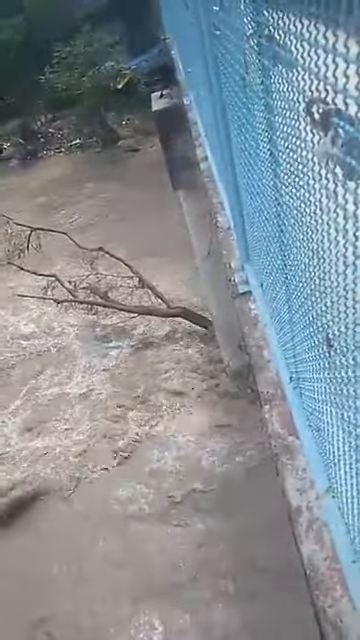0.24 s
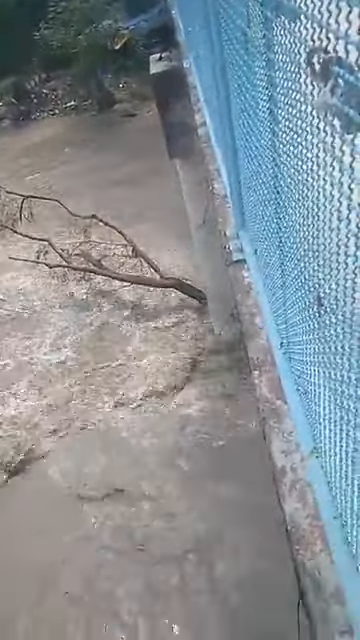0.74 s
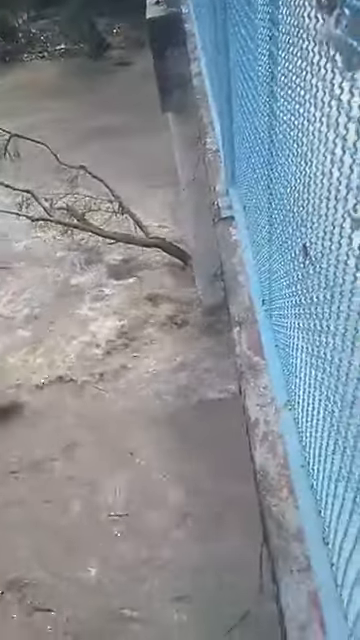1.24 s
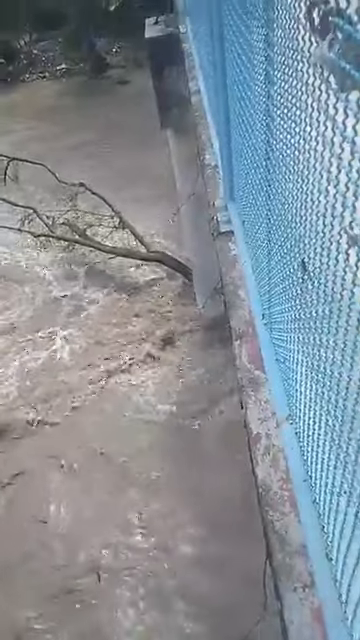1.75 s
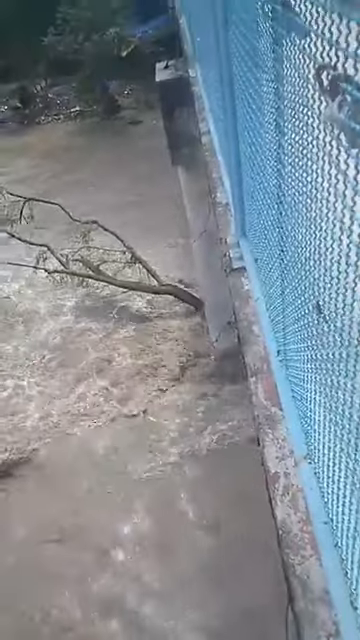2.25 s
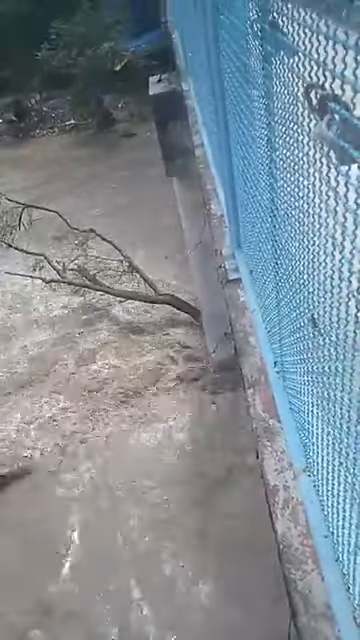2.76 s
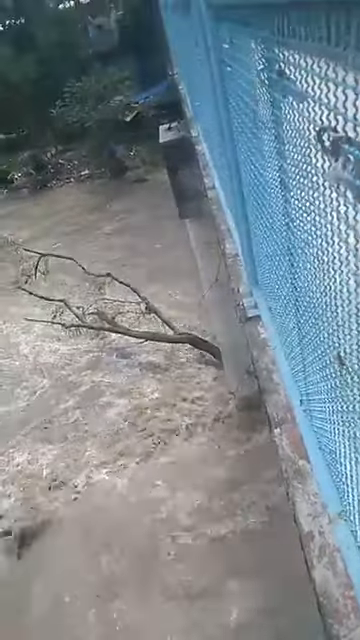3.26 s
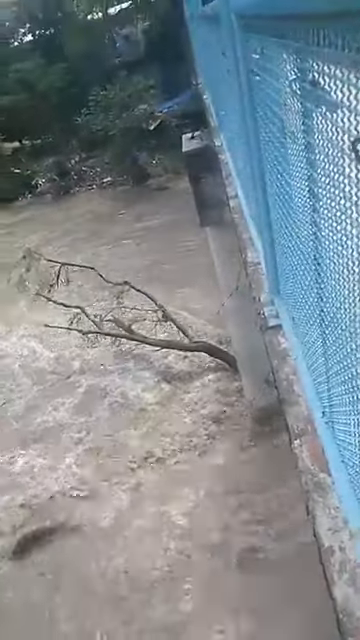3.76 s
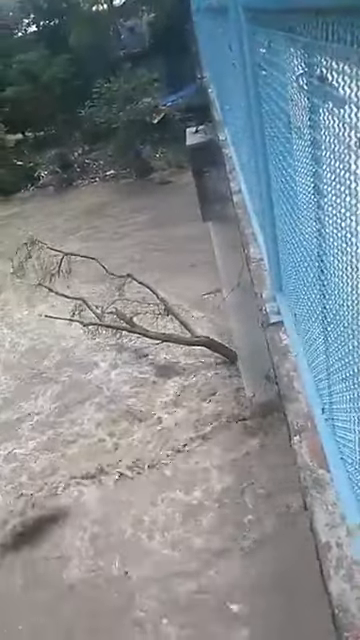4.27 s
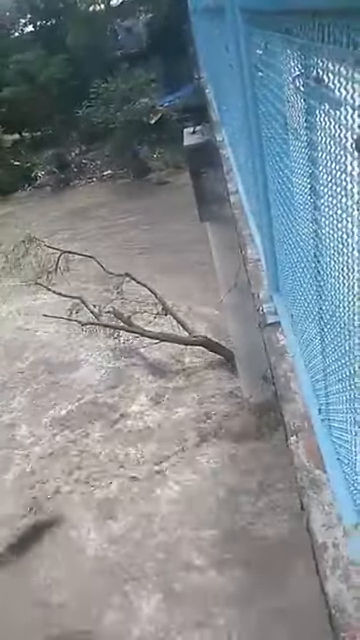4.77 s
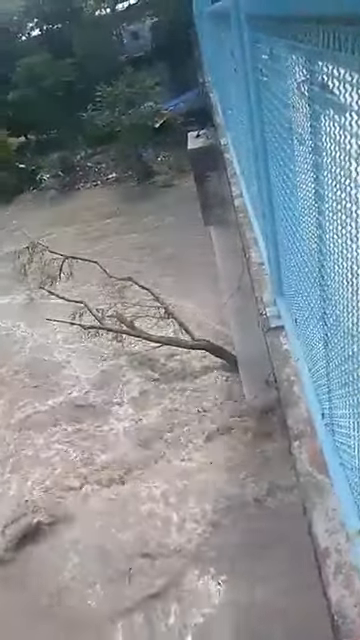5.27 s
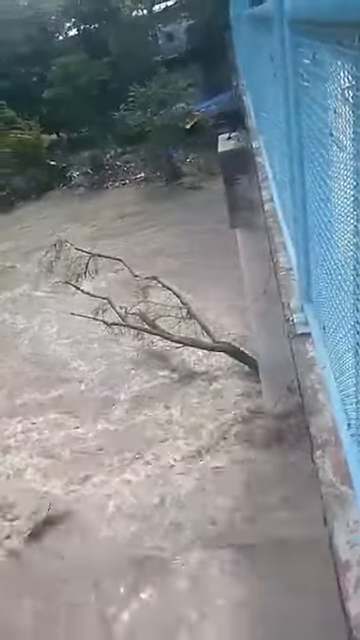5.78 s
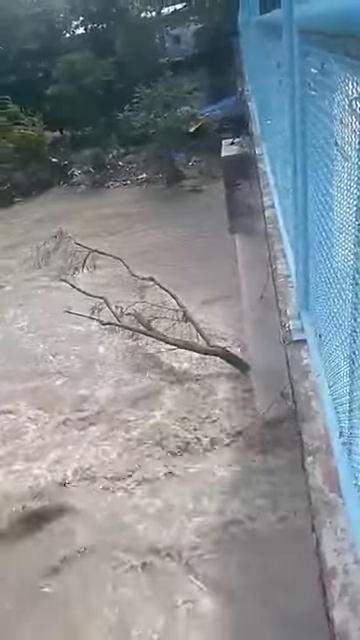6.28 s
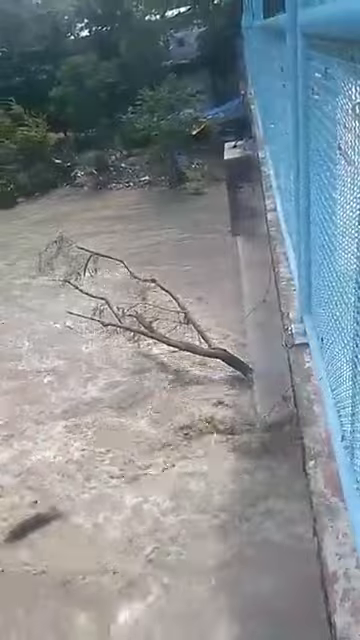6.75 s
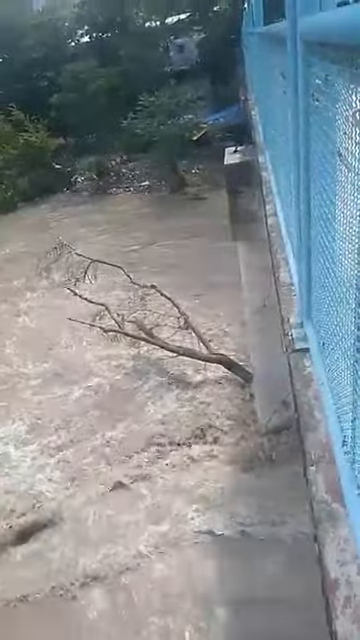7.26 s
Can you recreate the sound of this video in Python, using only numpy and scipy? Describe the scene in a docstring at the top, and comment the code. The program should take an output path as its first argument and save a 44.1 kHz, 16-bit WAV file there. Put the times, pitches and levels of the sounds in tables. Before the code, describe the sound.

A swollen river seethes and fizzes below a railing, its constant rush broken by clustered deep glugs and bright watery plops.

```python
"""A swollen river rushes under a bridge, heard from the railing above.
Shaped noise makes the deep current and patchy spray; swarms of damped sines ring as bubbles.
Trapped air gulps and gurgles in runs of rising damped sines, with an echo under the deck.
Drifting notches, short dropouts and patchy flicker cut into the water; a puff of wind rumbles at the start."""
import sys
import numpy as np
from scipy import signal
from scipy.fft import rfft, irfft, next_fast_len
from scipy.io import wavfile
from scipy.ndimage import uniform_filter1d, map_coordinates

SR = 44100
rng = np.random.default_rng(int(sys.argv[2]) if len(sys.argv) > 2 else 0)


def dump(signal):
    """Clip the signal to [-1, 1] and save it as 16-bit WAV at the path in sys.argv[1]."""
    limited = np.clip(np.atleast_2d(signal).T, -1, 1)
    pcm = np.round(limited * 32767).astype(np.int16)
    wavfile.write(sys.argv[1], SR, pcm)


N = 331632

# spray thrown by the standing waves: start_s, level_db (before trim)
FOAM = [(0.0, -26), (0.04, -26), (0.63, -25.5), (1.17, -28.5), (1.19, -31), (1.23, -27), (1.51, -27.5),
        (1.8, -26.5), (2.09, -28.5), (2.2, -26), (2.74, -26), (2.87, -26), (2.97, -27), (3.08, -26),
        (3.25, -27.5), (3.46, -26), (3.79, -27), (3.81, -26.5), (4.04, -27), (4.42, -25), (4.46, -26.5),
        (5.07, -24.5), (5.09, -26), (5.44, -24.5), (5.55, -26.5), (6.47, -23.5), (6.93, -26), (6.97, -25),
        (7.5, -24.5), (7.52, -27.5)]
# random slosh on top of the slow swells; wander of the ringing pitch
SLOSH_KNOTS_PER_S, DRIFT_KNOTS_PER_S = 12, 6
# wander as a share of the pitch
CHURN_DRIFT, SPRAY_DRIFT = 0.012, 0.004


def amp(db):
    """Decibels to gain."""
    return 10 ** (np.asarray(db) / 20)


def unit(x):
    """Scale to rms 1."""
    return x / np.sqrt(np.mean(x ** 2) + 1e-20)


def along(points, hz):
    """Read (Hz, value) points on a log frequency axis."""
    f, v = np.transpose(points)
    return np.interp(np.log(hz + 1), np.log(f + 1), v)


def curves(rows):
    """One value per sample for each column after the time."""
    s, *cols = np.transpose(rows)
    return [np.interp(np.arange(N) / SR, s, c) for c in cols]


def wobble(knots_per_s):
    """A smooth curve through random knots."""
    knots = rng.standard_normal(int(N * knots_per_s / SR) + 4)
    return map_coordinates(knots, [np.arange(N) * knots_per_s / SR])


def filtered(x, response):
    """x times a response of frequency."""
    size = next_fast_len(N + SR // 2)
    gain = response(np.fft.rfftfreq(size, 1 / SR))
    return irfft(rfft(x, size) * gain, size)[:N]


def coloured(x, spectrum):
    """x through a spectrum, at rms 1."""
    return unit(filtered(x, lambda hz: amp(along(spectrum, hz))))


def patches(shape, size):
    """A smooth random field over frequency and time, rms 1; size is (bins of 43 Hz, steps of 12 ms)."""
    field = rng.standard_normal(shape)
    for axis in (0, 1, 0, 1):
        field = uniform_filter1d(field, size=size[axis], axis=axis)
    return unit(field)


def patchy_noise(patchy_db, size):
    """Noise whose level varies in patches of frequency and time, rms 1."""
    z = signal.stft(rng.standard_normal(N), nperseg=1024)[2]
    patched = z * amp(patchy_db * patches(z.shape, size))
    return unit(signal.istft(patched)[1][:N])


def drifting(x, share):
    """x with its pitch wandering by a share."""
    speed = 1 + share * wobble(DRIFT_KNOTS_PER_S)
    return map_coordinates(x, [np.cumsum(speed)], mode="mirror")


def bubbles(starts_s, hz, gains, cycles, rise):
    """Damped sines, 40 dB down after the given cycles, that rise in pitch as each bubble nears the surface."""
    n = np.arange(int(cycles * SR / hz.min()) + 2)
    turns = hz[:, None] * n / SR
    age = turns / cycles
    tone = np.sin(2 * np.pi * turns * (1 + rise * age / 2))
    attack = 1 - np.exp(-turns / 1.31)
    ring = tone * np.exp(-np.log(100) * age) * attack
    where = (np.abs(starts_s) * SR).astype(int)[:, None] + n
    return np.bincount(where.ravel(), (gains[:, None] * ring).ravel(), N)[:N]


def swarm(count, low_hz, high_hz, cycles, spread_db):
    """Bubbles of random size at random moments, rms 1; a positive spread makes a few much louder."""
    when, size, luck = rng.random((count, 3)).T
    gains = amp(-spread_db * np.log(luck + 0.01))
    hz = low_hz + (high_hz - low_hz) * size
    return unit(bubbles(when * N / SR, hz, gains, cycles, rise=0.1))


def sheen(hz):
    """Gain of the narrow resonances that colour the spray."""
    # centre_hz, width_hz, lift_db
    resonances = [(7396, 81, 9), (8060, 120, 5), (8170, 91, 5)]
    return amp(sum(db / (1 + (2 * (hz - centre) / width) ** 2) for centre, width, db in resonances))


def white_water():
    """Tiny bubbles wash and fizz along the pier and bursting foam hisses above them."""
    # wash along the pier: start_s, level_db (before trim)
    pier = [(0.0, -46), (0.75, -39.5), (0.79, -43.5), (0.98, -40), (1.38, -42), (1.42, -37.5),
            (2.83, -42.5), (2.99, -39.5), (3.31, -46), (3.56, -43.5), (4.52, -43.5), (5.05, -38),
            (5.17, -45), (5.19, -38.5), (5.55, -42.5), (5.63, -45), (6.35, -38), (7.01, -42.5),
            (7.39, -40.5), (7.52, -41)]
    # splashes that stand out: centre_s, lift_db, half_length_s
    splashes = [(2.237, 2, 0.0044), (3.83, 1, 0.029), (4.35, 1, 0.052)]
    # relative spectra, low to high: freq_hz, level_db_per_hz
    wash_spectrum = [(2400, -60), (2520, -33), (2620, 6.5), (2820, 10), (3180, 8), (3450, 3), (3700, -11),
                     (4000, -50)]
    fizz_spectrum = [(3300, -50), (3600, -7.5), (3760, -4), (3940, -2.5), (4100, 8), (4350, 8), (5100, 9.5),
                     (5450, 5.5), (5900, 9.5), (6500, -65)]
    spray_spectrum = [(5500, -37.5), (5950, -15.5), (6300, -3), (6570, -11.5), (6950, -1.5), (7350, -2.5),
                      (7600, -4.5), (8200, 1.5), (8680, 2), (8850, -22), (9020, -4), (9200, -19),
                      (9600, -62)]
    mist_spectrum = [(9000, -44), (9250, -15), (9420, 19.5), (9750, 15.5), (10050, 13.5), (10250, -8),
                     (10480, -1), (10750, 8.5), (11900, 8), (12650, -1.5), (13400, 8), (14150, 3.5),
                     (14400, 9), (15700, -3)]

    t = np.arange(N) / SR
    slosh_db = -0.17 * wobble(SLOSH_KNOTS_PER_S)
    for s, lift_db, length_s in splashes:
        slosh_db = slosh_db + lift_db * np.exp(-((t - s) / length_s) ** 2)
    pier_db = curves(pier)[0]
    # the fizz is steadier: it follows a third of the wash's swells
    fizz_db = -34 + 0.34 * (pier_db - pier_db.mean()) + slosh_db
    wash_db = pier_db + slosh_db
    spray_db = curves(FOAM)[0] + slosh_db

    tiny_bubbles = swarm(count=12000, low_hz=2460, high_hz=6060, cycles=34.0, spread_db=-1)
    tiny = 0.21 * tiny_bubbles + patchy_noise(patchy_db=2.16, size=(4, 5))
    foam = filtered(patchy_noise(patchy_db=1.85, size=(3, 4)), sheen)
    spray = coloured(drifting(foam, SPRAY_DRIFT), spray_spectrum)
    mist = coloured(patchy_noise(patchy_db=1.54, size=(9, 8)), mist_spectrum)

    # small splashes make the spray flutter, faster than the waves swell
    flutter_db = 0.63 * wobble(50) + 0.5 * wobble(150)
    flutter_db = flutter_db - uniform_filter1d(flutter_db, size=SR // 10)
    return (amp(wash_db + 0.25 + 0.5 * flutter_db) * coloured(tiny, wash_spectrum)
            + amp(fizz_db + 0.5 * flutter_db) * coloured(tiny, fizz_spectrum)
            + amp(spray_db + 0.52 + 0.64 * flutter_db) * spray
            + amp(spray_db - 6.5 + 1.16 * flutter_db) * mist)


def churning():
    """Clouds of bubbles ring under the crests; the harder a crest breaks, the more it seethes."""
    # how hard the crests break: start_s, level_db (before trim)
    crests = [(0.0, -43.5), (0.29, -41.5), (0.33, -34), (0.52, -43), (1.42, -41.5), (1.65, -45),
              (1.72, -33.5), (1.99, -41.5), (2.03, -51), (2.28, -39.5), (2.7, -37.5), (2.79, -47),
              (2.85, -39), (3.01, -41), (3.08, -34), (3.2, -47), (3.22, -37.5), (3.46, -45), (3.58, -36),
              (4.0, -35.5), (4.04, -46.5), (4.44, -35), (4.59, -43.5), (4.63, -35), (4.75, -42),
              (4.82, -35), (5.74, -36), (5.82, -45.5), (5.93, -34), (6.14, -35), (6.22, -29.5),
              (6.53, -32.5), (6.68, -30.5), (6.74, -35), (7.08, -33.5), (7.52, -32)]
    # relative spectra of the clouds and of the added seethe: freq_hz, level_db_per_hz
    cloud_spectrum = [(800, -48), (1080, -18), (1200, 0.5), (1310, -5.5), (1480, 11), (1610, 9), (1730, -4),
                      (1880, 8), (2020, -30), (2200, -29), (2600, -70)]
    seethe_spectrum = [(850, -27), (1080, -7.5), (1350, 1), (1550, -1.5), (1700, 10.5), (1920, 3.5),
                       (2040, -1.5), (2150, -75), (2400, -60)]

    churn_db = curves(crests)[0] + 1.5 * wobble(SLOSH_KNOTS_PER_S)
    surge_db = churn_db - churn_db.mean()
    ringing = swarm(count=2000, low_hz=1060.0, high_hz=2046, cycles=126.0, spread_db=2.5)
    cloud_noise = patchy_noise(patchy_db=3, size=(2, 8))
    seethe_noise = patchy_noise(patchy_db=3.5, size=(2, 8))
    clouds = drifting(coloured(0.5 * ringing + cloud_noise, cloud_spectrum), CHURN_DRIFT)
    seethe = drifting(coloured(seethe_noise, seethe_spectrum), CHURN_DRIFT)
    return amp(churn_db - 1.8 - 0.24 * surge_db) * clouds + amp(churn_db - 9.0 + 0.77 * surge_db) * seethe


def current():
    """The deep, even roll of the river with small bubbles all over its surface."""
    # relative spectrum: freq_hz, level_db_per_hz
    roll_spectrum = [(20, -34), (55, -11), (68, -2.5), (88, -5), (170, -1.5), (330, -2), (410, -2),
                     (490, -7), (590, -6.5), (760, -6), (1100, -7.5), (1500, -37), (2400, -7), (3000, -70)]
    roll = amp(-54.0) * coloured(patchy_noise(patchy_db=2.5, size=(3, 5)), roll_spectrum)
    glugs = amp(-61) * swarm(count=160, low_hz=274, high_hz=417, cycles=10.7, spread_db=5.5)
    babble = amp(-60) * swarm(count=700, low_hz=637, high_hz=1247, cycles=28, spread_db=4.5)
    return roll + glugs + babble


def wind():
    """A short puff of wind rumbles on the microphone, holds and dies away."""
    # relative spectrum: freq_hz, level_db_per_hz
    buffet_spectrum = [(20, -18), (45, -21), (70, -1), (105, -12), (200, -19), (500, -60)]
    puff_db, hold_s, fall_db_per_s = -44.5, 0.072, 62
    falling_s = np.maximum(np.arange(N) / SR - hold_s, 0)
    return amp(puff_db - fall_db_per_s * falling_s) * coloured(rng.standard_normal(N), buffet_spectrum)


def strays(count, db, hz, scatter):
    """Rows of lesser air pockets, one at a random moment in each equal stretch of time."""
    when, strength, size = rng.random((count, 3)).T
    s = (np.arange(count) + when) / count * N / SR
    level_db = db + 2.5 * (2 * strength - 1)
    return np.transpose([s, level_db, hz * np.exp(scatter * (2 * size - 1))])


def clusters(rows, count, length_s, scatter, cycles, fade_db):
    """Each air pocket breaks into a run of bubbles of similar size; the second is the loudest."""
    s, db, hz = np.transpose(rows)[:, :, None]
    delay, size = rng.random((len(rows), 2, count)).transpose(1, 0, 2)
    lesser = np.arange(count) != 1
    # place in the run as a share of its length, 0 at the loudest
    place = (np.arange(count) - 1 + lesser * (delay - 0.5)) / count
    pitch_hz = hz * np.exp(scatter * lesser * (2 * size - 1))
    gains = amp(db + fade_db * (np.abs(place) + 0.06 * (place < 0)))
    return bubbles((s + length_s * place).ravel(), pitch_hz.ravel(), gains.ravel(), cycles, rise=0.034)


def air_pockets():
    """Waves fold over and swallow air: deep gulps, lighter gurgles, and rare thuds as whole waves slump."""
    # largest pockets, loudest mid-sized clusters, slumps: loudest_s, level_db (before trim), pitch_hz
    large_gulps = [(0.22, -37, 322), (0.348, -35, 392), (0.635, -37, 324), (1.21, -36, 380),
                   (1.292, -43.5, 194), (1.373, -33, 392), (1.408, -33, 398), (1.449, -48, 178),
                   (1.69, -37, 385), (1.76, -43, 380), (1.945, -37, 258), (2.21, -35.5, 361),
                   (2.264, -36.5, 370), (2.351, -29, 274), (2.395, -25.5, 330), (2.439, -31, 363),
                   (2.554, -29.5, 322), (2.599, -40.5, 198), (2.678, -26.5, 324), (2.8, -31.5, 315),
                   (3.084, -47, 203), (3.693, -31.5, 375), (3.99, -40.5, 340), (4.14, -37, 366),
                   (4.231, -29.5, 343), (4.28, -37.5, 378), (4.37, -40, 375), (4.843, -34.5, 271),
                   (5.04, -37.5, 364), (5.15, -37, 354), (5.206, -29.5, 312), (5.326, -37, 373),
                   (5.46, -38, 374), (6.048, -33.5, 263), (6.27, -39, 400), (6.457, -32, 390),
                   (6.529, -28, 320), (6.589, -23.5, 322), (6.638, -26.5, 263), (6.645, -38.5, 183),
                   (6.887, -31, 360), (6.949, -28.5, 286), (7.085, -35, 325), (7.232, -32, 349),
                   (7.296, -30.5, 332), (7.41, -38, 295), (7.481, -45, 221)]
    loud_gurgles = [(0.165, -39.5, 730), (0.435, -40.5, 698), (0.608, -31, 1197), (0.626, -39.5, 637),
                    (0.8, -35, 1196), (0.82, -43, 886), (1.52, -40, 750), (1.728, -36.5, 783),
                    (1.815, -40, 934), (1.92, -33, 1255), (2.06, -35.5, 1227), (2.103, -28.5, 1200),
                    (2.16, -32.5, 1200), (2.745, -33, 1240), (2.857, -31, 1214), (3.043, -35.5, 1005),
                    (3.084, -38, 834), (3.25, -44, 690), (5.258, -26, 1132), (5.27, -39, 740),
                    (5.33, -28, 1215), (5.525, -41, 915), (5.8, -31, 1245), (6.01, -37, 890),
                    (6.126, -28, 1143), (6.3, -29, 1244), (6.635, -34, 953), (6.645, -44, 750),
                    (6.64, -29, 1144), (6.674, -26, 1236), (6.79, -36, 1003), (7.14, -41, 716),
                    (7.39, -39, 910)]
    slumps = [(2.625, -56, 65), (3.495, -48, 81), (6.145, -50, 94), (6.625, -47.5, 78)]
    deep = np.vstack([large_gulps, strays(count=12, db=-43, hz=360, scatter=0.086)])
    light = np.vstack([loud_gurgles, strays(count=12, db=-49.5, hz=838, scatter=0.223)])
    gulps = clusters(deep, count=5, length_s=0.051, scatter=0.18, cycles=12.9, fade_db=-23.5)
    gurgles = clusters(light, count=4, length_s=0.06, scatter=0.032, cycles=38.5, fade_db=-12.5)
    thuds = clusters(slumps, count=3, length_s=0.057, scatter=0.25, cycles=4, fade_db=-22)
    return amp(3.5) * gulps + amp(1.5) * gurgles + amp(12.0) * thuds


def bridge(x):
    """The underside of the deck answers with a short diffuse tail: noise decaying at a rate set by frequency."""
    # echo between water and deck: freq_hz, t60_s
    decay = [(200, 0.28), (1000, 0.59), (8000, 0.13)]
    hz, t, z = signal.stft(rng.standard_normal(SR // 2), SR, nperseg=256)
    t60_s = along(decay, hz)[:, None]
    tail = signal.istft(z * np.exp(-np.log(1000) * t / t60_s))[1]
    return signal.fftconvolve(x, tail / np.linalg.norm(tail))[:N]


def notched(x):
    """Drifting notches, short dropouts and patchy flicker cut into the whole mix before the wind is added."""
    # steep-sided notch that drifts and changes width: start_s, centre_hz, width_hz
    drifting_notch = [(0, 3650, 450), (.35, 3530, 170), (.62, 3740, 100), (.9, 3550, 400),
                      (1.22, 3630, 560), (1.33, 3470, 70), (1.46, 3740, 440), (1.65, 3760, 320),
                      (1.72, 3700, 30), (1.78, 3620, 40), (1.81, 3550, 400), (2.05, 3640, 456),
                      (2.25, 3590, 260), (2.77, 3690, 370), (2.98, 3670, 40), (3.2, 3640, 420),
                      (3.4, 3430, 300), (3.55, 3570, 570), (3.85, 3470, 490), (4.15, 3450, 360),
                      (4.55, 3580, 350), (4.85, 3530, 410), (5.4, 3530, 290), (5.52, 3400, 40),
                      (5.8, 3760, 320), (5.95, 3580, 20), (6.5, 3500, 25), (6.88, 3500, 70),
                      (6.96, 3280, 300), (7.08, 3500, 400), (7.16, 3320, 350), (7.52, 3280, 230)]
    # gap between churn and wash: start_s, width_hz, depth_db
    gap = [(0, 150, 5), (2.2, 260, 22), (2.58, 500, 14), (2.8, 290, 22), (4.7, 230, 10), (5.2, 370, 16),
           (5.7, 230, 15), (6.3, 427, 18), (6.9, 460, 35), (7.021, 378, 5), (7.52, 400, 13)]
    # short dropouts in a band: centre_s, length_s, centre_hz, width_hz, depth_db
    dips = [(0.445, 0.15, 5640, 430, 36), (0.42, .12, 12550, 450, 10), (1.383, 0.79, 9600, 1100, 7.5),
            (2.0, 0.074, 5670, 560, 35), (2.02, .1, 12550, 700, 6), (3.63, 0.27, 5880, 280, 26),
            (4.54, .087, 5700, 420, 25), (4.69, 0.11, 4740, 1300, 4.5), (5.42, 0.18, 5840, 170, 20),
            (5.85, 0.62, 3240, 400, 7), (6.9, .24, 5870, 170, 12)]
    # fixed notches: centre_hz, half_width_hz, depth_db_per_db (of the spray level curve below a set level)
    fixed_notches = [(5795, 450, 4.5), (9120, 90, 5.5), (9600, 940, 2), (10360, 110, 9)]
    # bands that flicker in patches: centre_hz, half_width_hz, depth_db
    flicker = [(2216, 290, 13), (2416, 166, 39), (3327, 146, 20), (3700, 310, 20), (5310, 93, 12),
               (5840, 170, 23), (10060, 150, 22)]
    notch_depth_db, gap_hz, set_level_db = 63, 2380, -24

    hz, s, z = signal.stft(x, SR, nperseg=1024)

    def bell(centre, width):
        return np.exp(-((hz[:, None] - centre) / width) ** 2)

    def trough(centre, width):
        return 1 / (1 + (2 * (hz[:, None] - centre) / width) ** 12)

    when, centre, width = np.transpose(drifting_notch)
    drifting_db = notch_depth_db * trough(np.interp(s, when, centre), np.interp(s, when, width))
    when, width, depth_db = np.transpose(gap)
    gap_db = np.interp(s, when, depth_db) * trough(gap_hz, np.interp(s, when, width))
    dip_db = sum(db * np.exp(-(2 * (s - at) / length) ** 4) * trough(c, w)
                 for at, length, c, w, db in dips)
    # the fixed notches deepen as the spray level curve falls below the set level
    below_db = np.maximum(set_level_db - np.interp(s, *np.transpose(FOAM)), 0)
    fixed_db = below_db * sum(slope * bell(c, w) for c, w, slope in fixed_notches)
    # mostly cuts; lifts by at most a quarter of the depth
    flicker_share = np.clip(1.6 * patches(z.shape, size=(4, 7)), -0.25, 1)
    flicker_db = flicker_share * sum(db * bell(c, w) for c, w, db in flicker)
    return signal.istft(z * amp(-drifting_db - gap_db - dip_db - fixed_db - flicker_db))[1][:N]


def scene():
    """The river, the bridge's echo of its air pockets, and the wind."""
    pockets = air_pockets()
    river = white_water() + churning() + current() + pockets + amp(-8.0) * bridge(pockets)
    return (notched(river) + wind())[None]


def record(dry):
    """The recorder keeps nothing above its band limit."""
    top_hz = 15750
    return filtered(dry[0], lambda hz: hz < top_hz)[None]


dry = scene()
out = record(dry)
dump(out)
```